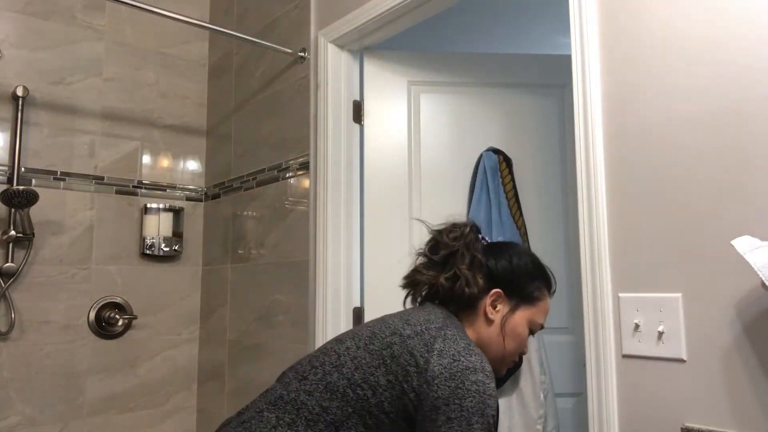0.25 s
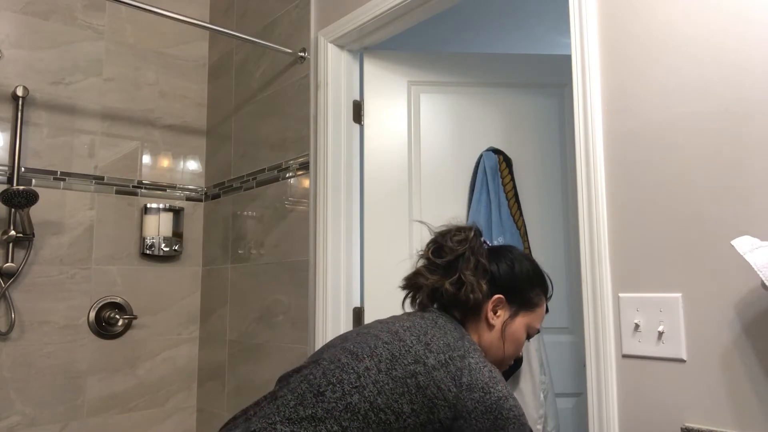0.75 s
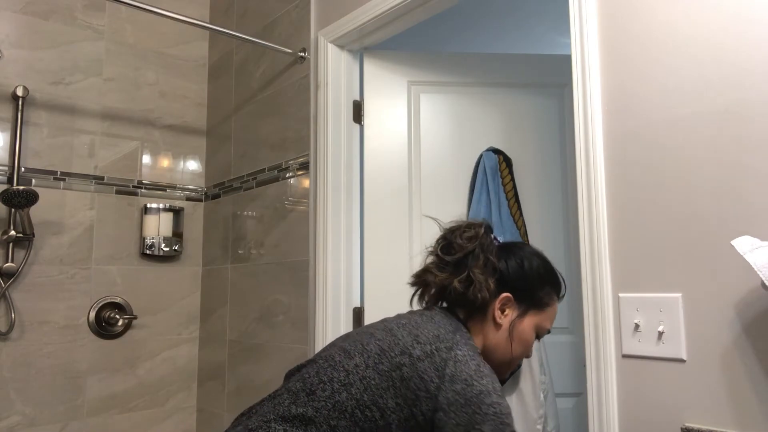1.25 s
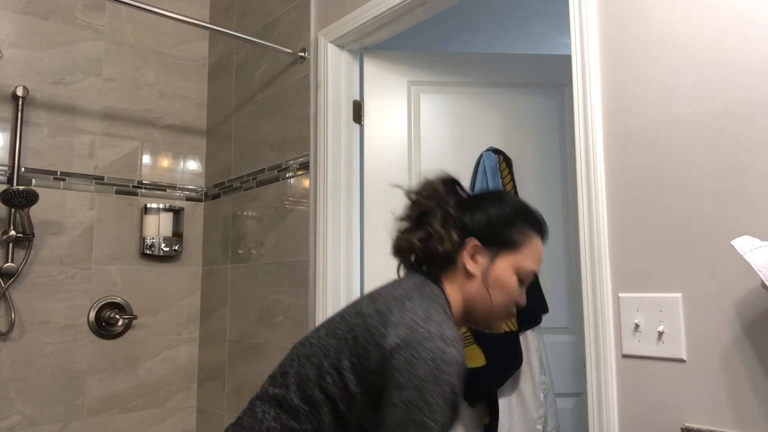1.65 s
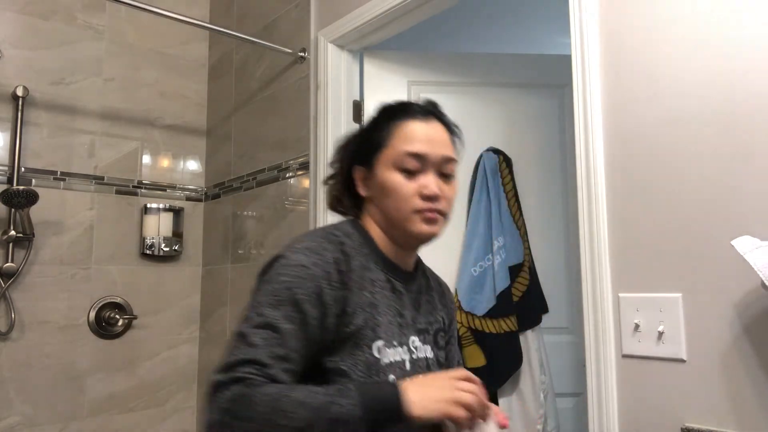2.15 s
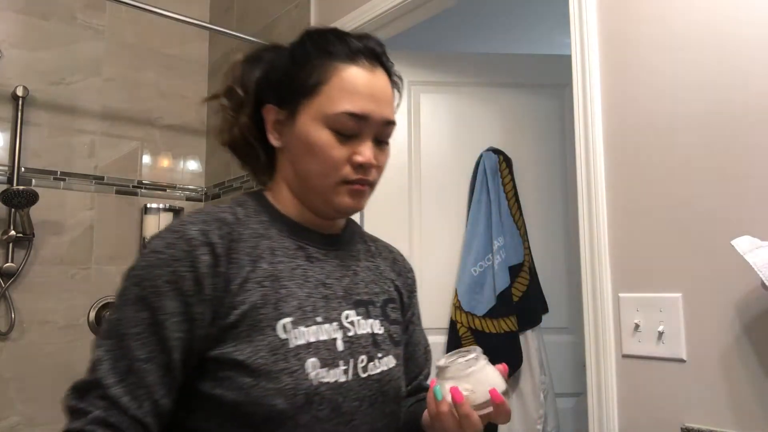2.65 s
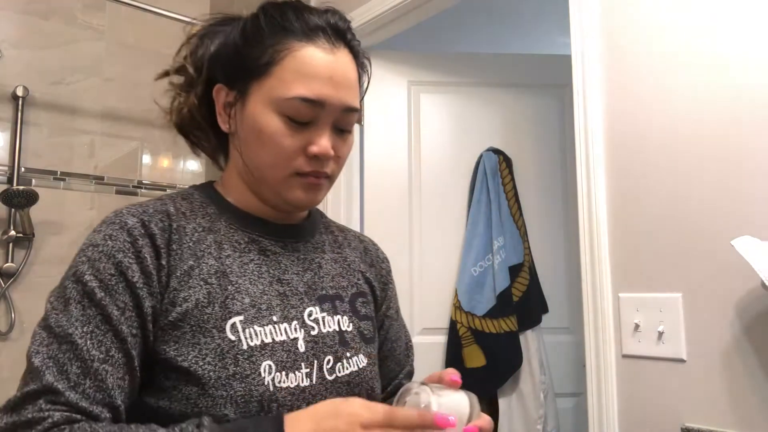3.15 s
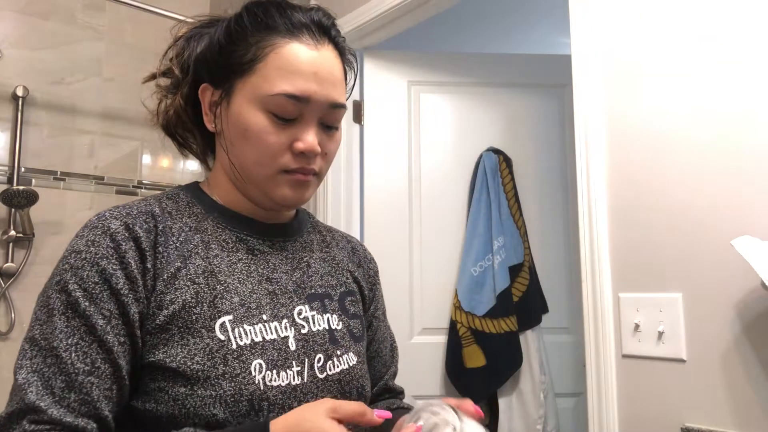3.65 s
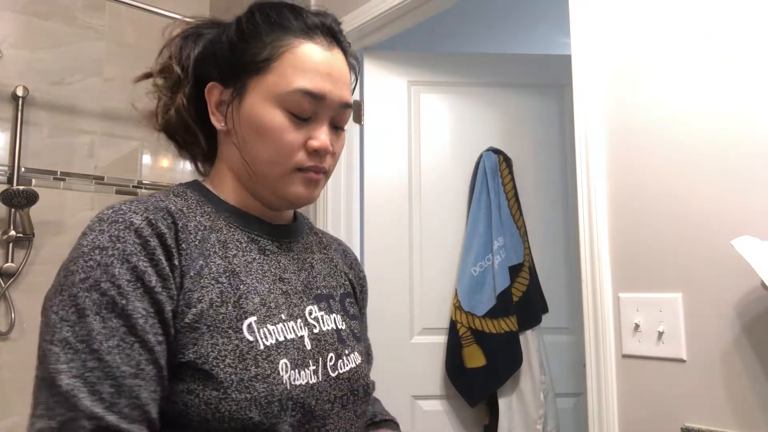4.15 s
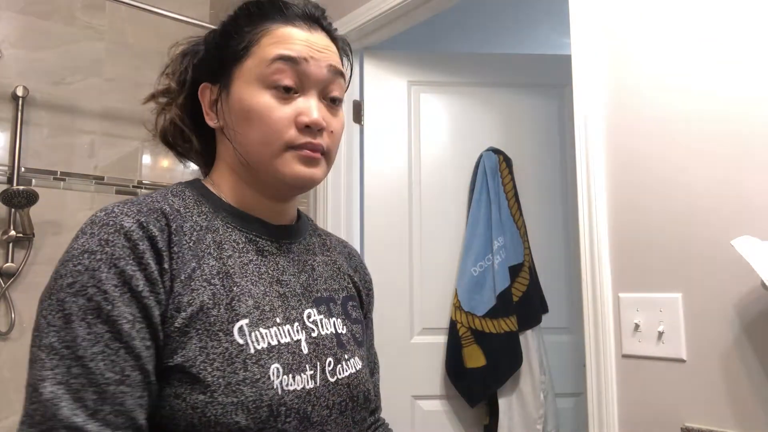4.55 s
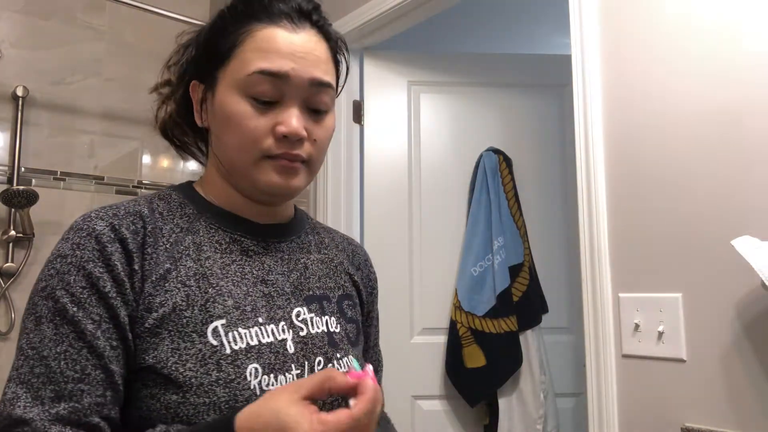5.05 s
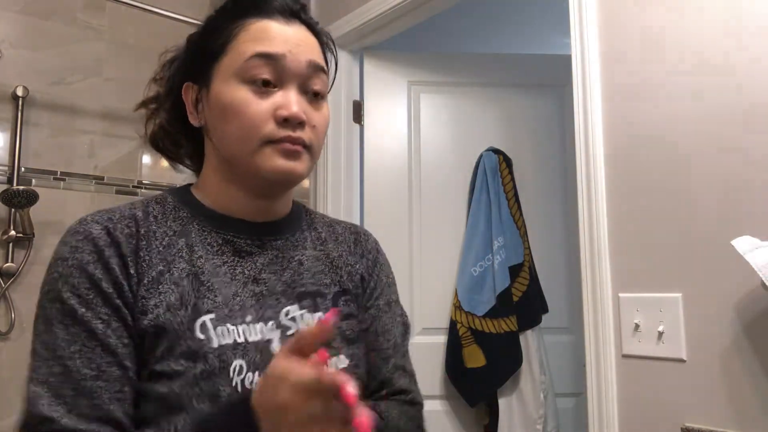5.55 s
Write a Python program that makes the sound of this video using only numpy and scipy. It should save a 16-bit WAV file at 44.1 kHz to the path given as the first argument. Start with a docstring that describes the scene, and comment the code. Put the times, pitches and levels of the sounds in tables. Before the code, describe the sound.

A wooden drawer bangs to its stop, contents tumble, sleeves rustle, a lid clacks, then a jar and lid knock hard on a counter before hands rub.

```python
"""A jar out of the bathroom drawer

A small tiled bathroom, one microphone, room air and a faint mains hum (filtered noise, sines) behind it all.
A wooden drawer runs to its stop, things shift inside and a glass jar is taken out; sleeves rustle, the lid
clacks off, nails ping the glass, jar and lid land hard on the counter and two hands rub together.
Sliding is a shower of tiny slips; each blow is a push, a chatter and ringing modes; the tiles add a tail."""
import sys
import numpy as np
from scipy import signal
from scipy.fft import rfft, irfft
from scipy.io import wavfile

SR = 44100
rng = np.random.default_rng(int(sys.argv[2]) if len(sys.argv) > 2 else 0)


def store_pcm(level_fs):
    """Save levels as 16-bit WAV."""
    pcm = np.round(np.clip(level_fs, -1, 1) * 32767).astype(np.int16)
    wavfile.write(sys.argv[1], SR, np.atleast_2d(pcm).T)


N = 255780

# colour of rubbing cloth and skin, and of the small things rattling: f/Hz, level/dB
RUB_COLOUR = [(250, -7.5), (600, -3), (1200, -8), (2500, -8.5), (4500, -6.5), (7500, -11.5), (10000, -19),
              (16000, -22)]
# colour of a contact on the glass: f/Hz, level/dB
PING_COLOUR = [(600, -43.5), (1200, -34.5), (3500, -29.5), (4900, -25), (5550, 12), (6300, -15.5),
               (8000, -18), (15500, -36)]
# what the glass rings with: f/Hz, relative level/dB, t60/s before ring_length scales it
GLASS_MODES = [(5420, -3, .1), (5505, -4, .24), (5548, -2, .27), (5610, -3, .16), (5730, 0, .07),
               (13150, -22, .13)]
CATCH_S, STOP_S = .235, .28  # the drawer rides into its catch, then stops


def undb(db):
    """Decibels to gain."""
    return 10 ** (np.asarray(db) / 20)


def unit(x):
    """Scale to an energy of one."""
    return x / np.sqrt(np.sum(x ** 2) + 1e-30)


def lookup(points, hz):
    """Read a table on a log-frequency axis."""
    f, value = np.transpose(points)
    return np.interp(np.log(hz), np.log(f), value)


def add(track, s, sound):
    """Mix a sound into the track at a time."""
    start = int(s * SR)
    part = sound[max(-start, 0):N - start]
    track[max(start, 0):max(start, 0) + len(part)] += part


def coloured(x, points, tilt=0, size=4096):
    """Causal filter with a given spectrum, tilted around 1 kHz in dB per octave."""
    hz = np.maximum(np.arange(size // 2 + 1) * SR / size, 1)
    octaves = np.log2(np.maximum(hz, 250) / 1000)  # the tilt levels out below 250 Hz
    # folding the cepstrum gives minimum phase, so the energy comes early
    cepstrum = irfft(np.log(undb(lookup(points, hz) + tilt * octaves)))
    cepstrum[1:size // 2] *= 2
    cepstrum[size // 2 + 1:] = 0
    impulse = irfft(np.exp(rfft(cepstrum)))
    return signal.fftconvolve(x, impulse)


def fade(t, t60):
    """Exponential decay, 60 dB down after t60."""
    return np.exp(-np.log(1000) * t / t60)


def room(dry, wet_db, build_s=0.00045, count=40):
    """Tiles close by: a dense noise tail that builds within about a millisecond and dies band by band."""
    # decay of the tiled room: f/Hz, t60/s
    decay = [(60, 0.5), (250, 0.6), (700, 0.59), (1500, 0.54), (3000, 0.54), (5500, 0.49), (9000, 0.27),
             (15000, 0.35)]
    t = np.arange(SR) / SR
    hz = np.arange(SR // 2 + 1)
    edges = np.geomspace(30, SR / 2, count + 1)
    noise, tail = rfft(rng.standard_normal(SR)), 0
    for lo, hi in zip(edges, edges[1:]):
        band = irfft(noise * ((hz >= lo) & (hz < hi)), SR)
        build = 1 - np.exp(-(t / build_s) ** 2)
        shape = fade(t, lookup(decay, np.sqrt(lo * hi))) * build
        # each band's energy goes by its width
        tail = tail + unit(band * shape) * np.sqrt(2 * (hi - lo) / SR)
    return dry + undb(wet_db) * signal.fftconvolve(dry, tail)[:N]


def blows(rows, colour, modes, contact_s, chatter_db, ring_db=0, ring_length=1):
    """Each blow is a sharp push and a few ms of chatter at the contact, and sets the modes ringing."""
    out, t = np.zeros(N), np.arange(SR // 2) / SR
    for s, db, tilt in rows:
        chatter = unit(rng.standard_normal(len(t)) * np.exp(-t / contact_s))
        force = undb(chatter_db) * chatter
        force[0] += 1
        crack = unit(coloured(force, colour, tilt)[:len(t)])
        ring = np.zeros(len(t))
        for hz, mode_db, t60 in modes:
            # the place of the blow decides how strongly each mode speaks
            gain = undb(mode_db + tilt * np.log2(hz) + 2 * rng.standard_normal()) * rng.choice([-1, 1])
            ring += gain * np.sin(2 * np.pi * hz * t) * fade(t, t60 * ring_length)
        hit = unit(crack + undb(ring_db) * unit(ring))
        # the level is the rms the blow would have if packed into 8 ms
        add(out, s, undb(db) * hit * np.sqrt(.008 * SR))
    return out


def bouncing(rows, lead_s, touch_db, gap_s, drop_db, dull_db, count, uneven=.06):
    """A light touch comes just before each blow; rebounds follow at uneven gaps, stepping in level and tilt."""
    contacts = []
    for s, db, tilt in rows:
        contacts.append((s - lead_s, db + touch_db, tilt - dull_db))
        for k in range(count + 1):
            contacts.append((s, db - k * drop_db, tilt - k * dull_db))
            s = s + gap_s * np.exp(uneven * rng.standard_normal())
    return contacts


def friction(colour, slips_per_s, spread_db, tilt=0):
    """A shower of tiny slips of uneven size under a wavering grip, with an rms of one."""
    grip_per_s, grip_db = 80, 2.5  # sliding things catch and let go, which shakes the level
    chance, size = rng.random(N), rng.standard_normal(N)
    push, grip = rng.standard_normal(N), rng.standard_normal(N)
    grip = np.interp(np.arange(N) / SR * grip_per_s, np.arange(N), grip)
    happens = chance < slips_per_s / SR
    slips = happens * undb(spread_db * size + grip_db * grip) * np.sign(push)
    return unit(coloured(slips, colour, tilt)[:N]) * np.sqrt(N)


def stroke(start, end, db, attack_s, release_s, sag_db_per_s=0):
    """Gain of one sliding movement: it swells, holds, sags or grows, and is released."""
    t = np.arange(N) / SR
    edges = np.clip((t - start) / attack_s, 0, 1) * np.clip((end - t) / release_s, 0, 1)
    return edges * undb(db - sag_db_per_s * np.clip(t - start, 0, end - start))


def along(curve, edge_s=.004):
    """Gain that follows a level curve, fading to silence at its ends."""
    s, db = np.transpose(curve)
    return undb(np.interp(np.arange(N) / SR, s, db)) * stroke(s[0], s[-1], 0, edge_s, edge_s)


def resonating(x, resonances, sharpness):
    """Friction also excites broad resonances of the things in touch."""
    body = 0
    for hz, db in resonances:
        peak = signal.iirpeak(hz, sharpness, fs=SR)
        body = body + undb(db) * unit(signal.lfilter(*peak, x + 1e-18))
    return x + body * np.sqrt(np.sum(x ** 2))


def background():
    """Still room air is steady filtered noise; the mains hum is a few steady sines."""
    # colour of the room air: f/Hz, level/dB
    air_colour = [(18, -47.5), (30, -18), (64, -17.5), (93, -17), (124, 1), (145, -10.5), (170, -10),
                  (287, -17), (1190, -26), (1350, -29.5), (3140, -33.5), (5590, -34), (16000, -47)]
    # mains hum: f/Hz, rms level/dB
    hum_lines = [(60, -77), (120, -61.5), (240, -79), (1200, -87.5)]
    t = np.arange(N) / SR
    air = coloured(rng.standard_normal(N + SR), air_colour)[SR:SR + N]
    hum = sum(undb(db) * np.sqrt(2) * np.sin(2 * np.pi * (hz * t + rng.random())) for hz, db in hum_lines)
    return undb(-65) * unit(air) * np.sqrt(N) + hum


def sleeve():
    """Knitted cloth drags over the drawer's edge as the arm comes out; its treble comes and goes."""
    # the rustle, before the trims below: t/s, level/dB, treble against that level/dB
    rustle = [(1.7, -77, -10.5), (1.764, -62.5, -10), (1.866, -59.5, -15), (1.914, -48.5, -22),
              (1.946, -58.5, -14), (1.994, -60, -3), (2.118, -71, -12.5), (2.162, -60.5, -12),
              (2.17, -53, -18), (2.186, -55, -12), (2.304, -58, -13.5), (2.372, -63, -12),
              (2.394, -59, -18.5), (2.45, -66, -28)]
    # broad resonances of the cloth: f/Hz, level over the plain rustle/dB
    resonances = [(2900, -7), (6300, -21.5)]
    treble_hz = 7900
    s, db, treble_db = np.transpose(rustle)
    cloth = friction(RUB_COLOUR, slips_per_s=2200, spread_db=2.0, tilt=-1.4)
    body = signal.sosfilt(signal.butter(4, treble_hz, fs=SR, output="sos"), cloth)
    fibres = signal.sosfilt(signal.butter(4, treble_hz, "highpass", fs=SR, output="sos"), cloth)
    body = resonating(body * along(np.c_[s, db]), resonances, sharpness=3.4)
    treble = unit(fibres) * np.sqrt(N) * along(np.c_[s, db + treble_db])
    return undb(-4) * body + undb(-3.5) * treble


def hands():
    """Cloth and skin give a fine, soft hiss, coloured by the folds and hollows between them."""
    # fingers brushing briefly: t/s, level/dB before the trim below, tilt/dB per octave
    brushes = [(2.167, -56, 0), (5.21, -54.5, 0), (5.374, -53.5, 0), (5.504, -60.5, 1.5)]
    # palms rubbing: start t/s, attack/s, level/dB before the trim, resonance of the hollow between them f/Hz
    palm_rubs = [(5.524, 0.077, -46.5, 2720), (5.69, 0.0074, -51.5, 1700)]
    brush_s, rub_s, rub_release_s = 0.019, 0.11, 0.082
    fingers = 0
    for s, db, tilt in brushes:
        brush = friction(RUB_COLOUR, slips_per_s=3000, spread_db=2.5, tilt=tilt)
        fingers = fingers + brush * stroke(s, s + brush_s, db, attack_s=.002, release_s=.008)
    skin = friction(RUB_COLOUR, slips_per_s=3300, spread_db=2, tilt=3.2)
    palms = 0
    for s, attack_s, db, hz in palm_rubs:
        rub = skin * stroke(s, s + rub_s, db, attack_s, rub_release_s)
        palms = palms + resonating(rub, [(hz, -4)], sharpness=5.4)
    return room(sleeve() + undb(0.5) * (fingers + palms), wet_db=-2.5)


def jar_in_hand():
    """Held near the microphone: sharp clacks of the lid, and drier pings and ticks of the nails."""
    # the lid letting go and clacking against the rim: t/s, level/dB, tilt/dB per octave
    lid_clacks = [(2.6833, -49.5, 4), (2.689, -44, -9), (2.7038, -21.5, 1)]
    # the loosened lid wobbling on the rim: t/s, level/dB, tilt/dB per octave
    lid_wobbles = [(2.808, -29, 0), (2.841, -32, 1)]
    # fingernails and small knocks on the glass: t/s, level/dB, tilt/dB per octave
    glass_pings = [(1.977, -59, 5), (3.384, -66.5, 1.5), (3.490, -49.5, -6), (3.7504, -58.5, 17),
                   (4.0372, -35, -0.5)]
    # dry fingernail ticks: t/s, level/dB, tilt/dB per octave
    nail_ticks = [(3.709, -59, 1), (3.8541, -57.5, 5)]
    # colours of the clack, the wobble and the nail: f/Hz, level/dB
    clack_colour = [(45, -17), (110, -6.5), (250, -13.5), (600, -15.5), (1200, -7), (1800, 1.5),
                    (2500, -6.5), (3300, -3.5), (4100, -19), (5300, -2), (6900, -7.5), (8500, -17),
                    (14000, -21), (16000, -36)]
    wobble_colour = [(100, -39), (380, -15), (560, -5.5), (800, -9), (1400, 4), (1900, -3), (2600, -19),
                     (6500, -7.5), (9000, -16.5), (16000, -30)]
    nail_colour = [(1500, -40.5), (4000, -2), (6500, 2), (15000, 0)]
    # what lid and jar ring with: f/Hz, relative level/dB, t60/s
    clack_modes = [(565, -5, .2), (904, -9, .25), (1314, -2, .25), (1440, -1, .18), (1600, 1, .2),
                   (1960, -6, .12), (6820, -9, .12), (11650, -20, .14), (14200, -16, .1)]
    clacks = blows(lid_clacks, clack_colour, clack_modes, contact_s=.0015, chatter_db=1, ring_db=-16)
    rocking = bouncing(lid_wobbles, lead_s=0.0053, touch_db=-10, gap_s=0.0061, drop_db=12, dull_db=7, count=1)
    wobbles = blows(rocking, wobble_colour, clack_modes, contact_s=0.0031, chatter_db=8.0, ring_db=-4.5)
    pings = blows(glass_pings, PING_COLOUR, GLASS_MODES, contact_s=.003, chatter_db=0, ring_db=0,
                  ring_length=.7)
    ticks = blows(nail_ticks, nail_colour, [], contact_s=.0012, chatter_db=5)
    return room(clacks + wobbles, wet_db=-2.0) + room(pings + ticks, wet_db=-6.5)


def runners():
    """Already moving at the start, the drawer grows quieter and duller as it slows; the catch grinds briefly."""
    # colour of wood on the runners: f/Hz, level/dB
    runner_colour = [(24, -33.5), (40, -8), (142, -9), (173, 0.5), (329, -11), (432, -5), (466, -12),
                     (693, -16), (1170, -19.5), (1420, -22), (4030, -26.5), (7680, -36.5), (15000, -61)]
    start_s, run_db, catch_db = -.02, -36.5, -29.5
    treble_hz, bass_sag, treble_sag = 1500, 22.5, 47  # sags in dB per second: the treble fades first
    noise = friction(runner_colour, slips_per_s=2600, spread_db=0.5, tilt=.9)
    bass = signal.lfilter(*signal.butter(1, treble_hz, fs=SR), noise)
    run = 0
    for part, sag in [(bass, bass_sag), (noise - bass, treble_sag)]:
        run = run + part * stroke(start_s, STOP_S, run_db, attack_s=.008, release_s=0.00985, sag_db_per_s=sag)
    return run + noise * stroke(CATCH_S, STOP_S, catch_db, attack_s=.008, release_s=0.0075)


def rattle():
    """Small things shake against each other as the drawer brakes: harder up to the stop, then settling."""
    peak_db, rise_db_per_s, sag_db_per_s = -38.5, 171.5, 111
    t = np.arange(N) / SR
    db = peak_db - np.maximum(rise_db_per_s * (STOP_S - t), sag_db_per_s * (t - STOP_S))
    return friction(RUB_COLOUR, slips_per_s=2000, spread_db=3.5, tilt=-2.5) * undb(db) * (t > CATCH_S)


def drawer():
    """Low down behind the counter: wood thuds and rings, its contents bump, roll and scrape, the room answers."""
    # the drawer hitting its stop and its contents following: t/s, level/dB, tilt/dB per octave
    drawer_blows = [(.258, -10.5, -3.5), (.283, -9, -1), (.329, -19, -2.5), (.528, -26.5, -4),
                    (.551, -29.5, -3.5)]
    # a box bumping about inside: t/s, level/dB, tilt/dB per octave
    box_bumps = [(1.108, -31.5, 3.5), (1.148, -30, -4.5), (1.216, -38.5, -8), (1.251, -29, 0),
                 (2.388, -52, 1.5)]
    # soft nudges against the wood: t/s, level/dB, tilt/dB per octave
    soft_nudges = [(1.042, -43, -6), (1.0705, -40.5, -2), (1.082, -34.5, -9), (1.977, -43.5, 8.5),
                   (2.145, -56, -3)]
    # things scraping past each other: t/s, level/dB before the trim below
    scrape_level = [(0.642, -43), (0.66, -39), (0.732, -47.5), (0.742, -47), (0.906, -66), (1.02, -59.5),
                    (1.066, -49.5), (1.08, -39), (1.1, -41)]
    # colours of drawer, box, nudge, rolling container and scrape: f/Hz, level/dB
    drawer_colour = [(21, -51), (35, -19), (121, -13), (207, -14), (234, -11), (302, -5), (465, -6.5),
                     (663, -3.5), (734, -19), (970, -10), (1460, -22), (2810, -29.5), (15000, -57)]
    box_colour = [(29, -54), (50, -18.5), (107, -10), (150, -23.5), (236, -0.5), (272, -13.5), (362, 8),
                  (460, -7), (707, -2), (856, -9), (1140, -10.5), (1520, -13), (3340, -19.5), (5250, -34.5),
                  (15000, -57)]
    nudge_colour = [(80, -19), (250, -13), (400, 7.5), (600, 3.5), (800, -20.5), (1400, -19), (3000, -49),
                    (15000, -100)]
    roll_colour = [(40, -15), (120, -8), (230, -11), (350, 6.5), (570, -5.5), (720, -15), (1050, -18),
                   (1500, -36.5), (2700, -36), (8000, -74.5)]
    scrape_colour = [(120, -47), (200, -1.5), (272, 0.5), (358, -13), (447, -7), (609, -1.5), (761, -9),
                     (2020, -8.5), (12000, -47), (15600, -81), (22000, -120)]
    # what drawer and box ring with: f/Hz, relative level/dB, t60/s before ring_length scales it
    drawer_modes = [(106, -8, 0.19), (259.7, 0, 0.51), (366.4, 5, 0.19), (554, -1.5, 0.82),
                    (700.7, -9, 0.073), (735, -1.5, .23), (897, -2, .25), (1160, -23.5, .3)]
    box_modes = [(251.3, -16, 0.083), (393, 19, 0.17), (409, -27.5, .2), (687.4, 18.5, 0.16),
                 (1094, 1, 0.067), (2030, -28.5, 0.17), (2980, -15.5, 0.36), (3520, -24.5, 0.12)]
    # what the dragged box resonates with: f/Hz, level over the plain scrape/dB
    drag_resonances = [(240, 1), (356, 3.5), (706, 7.5), (1120, 5)]

    stops = bouncing(drawer_blows, lead_s=0.011, touch_db=-11.5, gap_s=.0085, drop_db=4.5, dull_db=-0.7, count=2)
    thuds = blows(stops, drawer_colour, drawer_modes, contact_s=0.0049, chatter_db=3, ring_db=-6,
                  ring_length=0.74)
    tumbles = bouncing(box_bumps, lead_s=0.0044, touch_db=-7.5, gap_s=0.011, drop_db=1.5, dull_db=-0.6, count=2)
    bumps = blows(tumbles, box_colour, box_modes, contact_s=.006, chatter_db=15.5, ring_db=-10.0)
    nudges = blows(soft_nudges, nudge_colour, [], contact_s=0.02, chatter_db=4)
    # a container rolls over the drawer bottom and loses speed
    roll = friction(roll_colour, slips_per_s=320, spread_db=5.5)
    roll = roll * stroke(0.32, .65, -30.5, attack_s=.015, release_s=.015, sag_db_per_s=21.5)
    scrape = friction(scrape_colour, slips_per_s=1200, spread_db=-0.4, tilt=-0.17) * along(scrape_level)
    # the box is dragged from one bump to the next
    drag = friction(box_colour, slips_per_s=800, spread_db=3, tilt=2.6)
    drag = drag * stroke(1.105, 1.31, -50.5, attack_s=0.0092, release_s=0.075)
    drag = resonating(drag, drag_resonances, sharpness=9.7)
    knocks = thuds + bumps + nudges
    sliding = runners() + rattle() + roll + undb(-1.7) * scrape + drag
    return room(knocks + sliding, wet_db=-1.0)


def skidding():
    """The jar's base judders over the counter: it sticks and slips, harder as it goes."""
    # skids: start t/s, end t/s, level at the start/dB
    skids = [(4.673, 4.722, -34), (4.814, 4.96, -50.5)]
    # colour of the skid: f/Hz, level/dB
    skid_colour = [(150, -6.5), (600, 1), (1200, -1), (2000, -7.5), (5500, -30), (8000, -32), (16000, -79)]
    # resonance: f/Hz, level over the plain skid/dB
    resonances = [(1040, 4)]
    judder_hz, growth_db_per_s = 26.6, 11
    t = np.arange(N) / SR
    push = 0
    for start, end, db in skids:
        gain = stroke(start, end, db, attack_s=.004, release_s=.004, sag_db_per_s=-growth_db_per_s)
        push = push + gain * np.sin(np.pi * judder_hz * (t - start)) ** 2
    noise = friction(skid_colour, slips_per_s=450, spread_db=2.7, tilt=.4)
    return resonating(push * noise, resonances, sharpness=3.0)


def glass_ring(knocks, share_db):
    """The glass sings after a knock; dull knocks hardly reach its pitch."""
    octaves = np.log2(GLASS_MODES[0][0] / 1000)
    rows = [(s, db + share_db + tilt * octaves, 0) for s, db, tilt in knocks]
    return blows(rows, PING_COLOUR, GLASS_MODES[:5], contact_s=.002, chatter_db=0, ring_db=30, ring_length=1.5)


def counter():
    """Jar and lid strike the hard top, which booms along with them; between the blows the jar skids."""
    # the jar set down and rocking: t/s, level/dB, tilt/dB per octave
    jar_knocks = [(4.505, -52.5, -1.5), (4.5282, -7.5, -0.5), (4.5716, -11.5, -1), (4.673, -32, 0)]
    # the lid set down after it: t/s, level/dB, tilt/dB per octave
    lid_knocks = [(4.931, -37.5, -6.5), (4.9597, -11.5, 0.5)]
    # colours of jar and lid on the top: f/Hz, level/dB
    jar_colour = [(35, -18.5), (80, -9), (120, -4), (260, -17), (380, -8), (1000, -4.5), (1400, -4.5),
                  (2600, -7), (3600, -12), (5600, -15), (6600, -28.5), (8000, -32), (10000, -49),
                  (15000, -54)]
    lid_colour = [(35, -12), (115, -14), (240, -23), (420, -12), (600, -2.5), (800, -11.5), (980, 0),
                  (1400, -6.5), (2400, -8.5), (4500, -12), (5600, -3.5), (6500, -13.5), (9000, -25),
                  (15500, -53.5)]
    # what the counter rings with: f/Hz, relative level/dB, t60/s
    counter_modes = [(118, -5, .25), (366, -8, .2), (565, -5, .25), (965, 2, .4), (1035, -1, .15),
                     (1275, 0, .13), (1790, -5, .08), (2078, 1, .09), (2600, 0, .08), (3055, -2, .1),
                     (3540, -4, .08), (4960, -8, .07), (6930, -17, .06), (7920, -19, .06)]
    jar_contacts = bouncing(jar_knocks, lead_s=.0102, touch_db=-28, gap_s=.014, drop_db=8.5, dull_db=3.5, count=1)
    lid_contacts = bouncing(lid_knocks, lead_s=0.0043, touch_db=-9, gap_s=.0052, drop_db=1.5, dull_db=1.06,
                            count=3)
    jar = blows(jar_contacts, jar_colour, counter_modes, contact_s=.004, chatter_db=6, ring_db=-7.5)
    lid = blows(lid_contacts, lid_colour, counter_modes, contact_s=.006, chatter_db=8, ring_db=-13)
    glass = glass_ring(jar_contacts, share_db=-21.5) + glass_ring(lid_contacts, share_db=-10)
    return room(jar + lid + glass + skidding(), wet_db=-1.5)


def scene():
    """Everything at one microphone."""
    return (background() + hands() + jar_in_hand() + drawer() + counter())[None]


def record(dry):
    """The microphone drops the deepest bass, rounds the loudest peaks and cuts the top."""
    thin = signal.sosfilt(signal.butter(6, 40, "highpass", fs=SR, output="sos"), dry)
    rounded = thin / (1 + thin ** 4) ** .25
    return signal.sosfilt(signal.ellip(8, .2, 70, 16200, fs=SR, output="sos"), rounded)


dry = scene()
out = record(dry)
store_pcm(out)
```